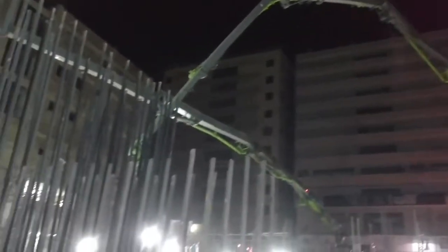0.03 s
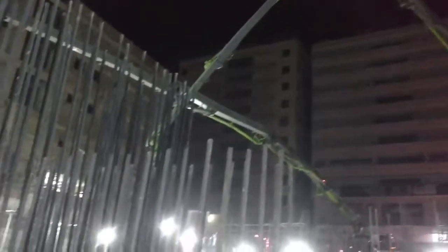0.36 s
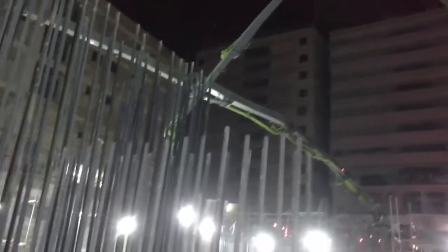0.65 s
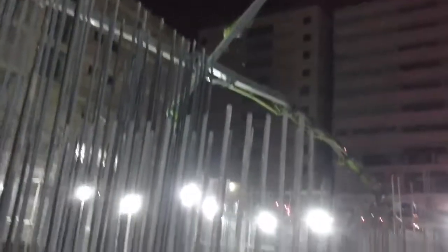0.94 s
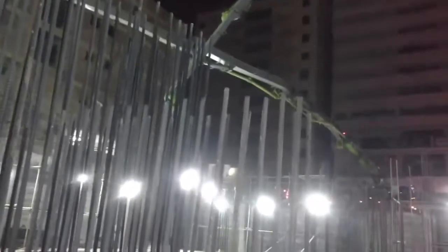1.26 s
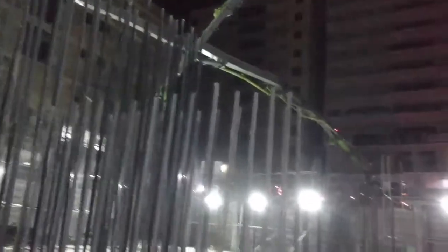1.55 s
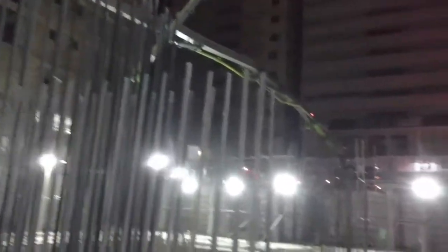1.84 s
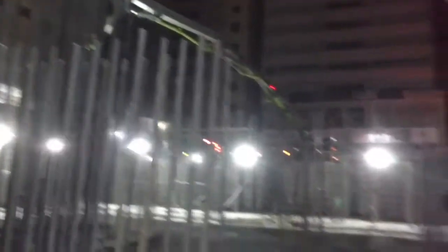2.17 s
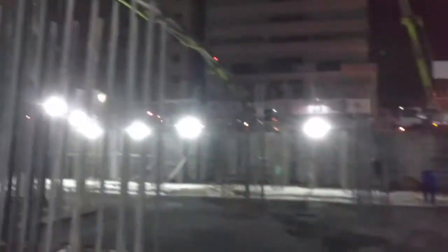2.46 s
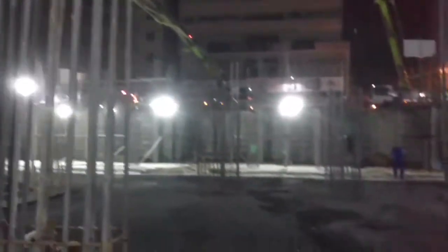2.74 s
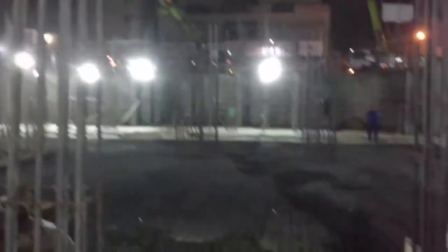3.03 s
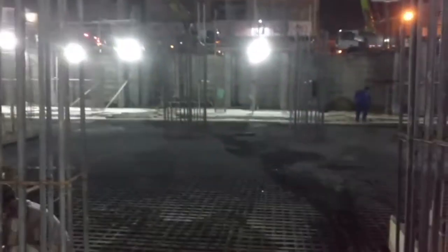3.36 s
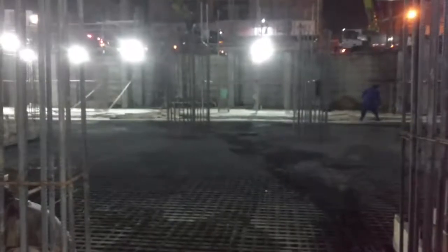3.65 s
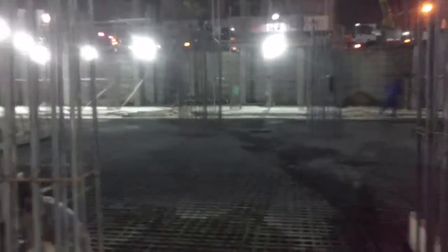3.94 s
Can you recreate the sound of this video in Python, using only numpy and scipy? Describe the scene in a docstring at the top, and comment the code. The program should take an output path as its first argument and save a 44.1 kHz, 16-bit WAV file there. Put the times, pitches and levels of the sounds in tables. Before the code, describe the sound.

Concrete pump running with a diesel roar and wavering whine, faint clanks and one close thump.

```python
"""A diesel drone, a wavering hydraulic whine and a broad roar and hiss carry across a building site
at night: a truck-mounted concrete pump is running, its sound scattered by the buildings.
Steel clanks twice in the distance; something thumps nearby and later scrapes.
Stereo widening combs the sound, and an automatic gain control ducks at the thump."""
import sys
import numpy as np
from scipy import signal
from scipy.fft import rfft, irfft, next_fast_len
from scipy.io import wavfile
from scipy.ndimage import uniform_filter1d, map_coordinates

SR = 44100
rng = np.random.default_rng(int(sys.argv[2]) if len(sys.argv) > 2 else 0)


def output_pcm(signal):
    """Save a mono or channel-first signal as 16-bit PCM at the path in sys.argv[1].

    Samples are clipped to [-1, 1] before scaling.
    """
    pcm = np.clip(np.atleast_2d(signal).T, -1, 1) * 32767
    wavfile.write(sys.argv[1], SR, np.round(pcm).astype(np.int16))


N = 176400

# Knocks on steel. Each row: start in seconds, pitch in Hz, level in dB.
CLANK_HITS = [(.313, 617, -21), (.731, 758, -18)]
# The steel's ring. Each row: multiple of the pitch, relative level in dB, 60 dB decay in seconds.
STEEL_MODES = [(1, -0.5, 0.077), (.86, -5.5, 0.088), (1.3, -9, 0.088)]
# Scrape strokes. Each row: start in seconds, length in seconds, grind in dB, grit in dB.
SCRAPE_STROKES = [(2.313, 0.038, -20.5, -42), (2.366, 0.0463, -25.5, -32), (2.401, 0.05, -23.5, -24),
                  (2.454, 0.0414, -31, -24)]
# The nearby blow. Each row: start in seconds, ring in dB, rattle in dB.
THUMP_HITS = [(0.6691, -5, -16.5)]
# The struck body. Each row: frequency in Hz, relative level in dB, 60 dB decay in seconds.
BODY_MODES = [(236, -10.5, 0.059), (330.2, -3, 0.031), (445, -6, 0.041), (710, -13, 0.031),
              (1090, -7.5, 0.023)]
# Colours of the noise layers. Each row: frequency in Hz, relative spectral density in dB.
GRIND_EQ = [(150, -24), (300, -0.5), (700, -1.5), (1150, 2), (1700, -5.5), (3000, -8), (8000, -47)]
GRIT_EQ = [(800, -31), (2000, -3), (3500, 0.5), (6400, -4), (9000, -7), (12000, -16), (15000, -28)]
RATTLE_EQ = [(200, -10), (450, 2), (800, -4), (1200, -11), (2500, -25), (8000, -40)]
RUMBLE_EQ = [(20, -30), (32, -17), (46, -27), (66, -9.5), (92, -6.5), (135, -4), (200, -1), (260, -0.5),
             (400, -16.5), (900, -68)]
ROAR_EQ = [(120, -43), (220, -20.5), (310, -2.5), (430, -5), (540, -3), (640, -0.5), (720, -3), (830, -4),
           (1060, -4.5), (1500, -7.5), (1850, -12.5), (3500, -51)]
HISS_EQ = [(700, -38), (1300, -5.5), (1600, -4.5), (2150, 3), (2450, -12), (2800, 1), (3250, -1.5),
           (4200, -6), (6200, -7.5), (8200, -12.5), (11000, -17.5), (13200, -25.5), (14500, -27.5),
           (15200, -60)]
# Fader rides on the machinery, before the trims. Each row: time in seconds, roar in dB, hiss in dB.
NOISE_RIDES = [(0, -25, -26), (0.2, -25.5, -26.5), (0.4, -25, -23.5), (0.6, -24.2, -23),
               (0.85, -24.5, -24.5), (1.05, -24.5, -22.5), (1.3, -24.5, -22.5), (1.6, -25.5, -20),
               (1.85, -23.5, -21), (2.05, -24.5, -23.5), (2.25, -24, -22), (2.55, -25.5, -24),
               (2.75, -27.0, -27.5), (3.05, -23.5, -23.5), (3.3, -24.5, -23.5), (3.5, -24.5, -24.5),
               (3.75, -22.5, -23), (4, -21, -22)]
# Fan and gear tones, and a ring of the pump's housing at 634 Hz. Each row: frequency in Hz, level in dB.
HUM_TONES = [(414, -51), (483, -47), (538, -45), (577, -58.5), (634, -46), (757, -45), (1087, -44)]
# The diesel drone. Each row: multiple of the working cycle, level in dB.
ENGINE_ORDERS = [(6, -60.5), (8, -53), (9, -53.5), (12, -46.5), (14, -54.5)]
# The hydraulic pump's speed, heard as its whine. Each row: time in seconds, pitch in Hz.
WHINE_PITCH = [(0, 334), (.32, 314.7), (.45, 334), (.8, 336.6), (1.5, 338.4), (1.85, 332.4), (2.2, 340),
               (2.32, 348.5), (2.44, 332.2), (2.95, 325.5), (3.2, 338.6), (3.45, 337.6), (3.62, 342),
               (3.8, 343), (4, 348.4)]
# Fader rides on the whine. Each row: time in seconds, then harmonics one, two and three in dB.
WHINE_RIDES = [(0, -41, -54, -51), (.25, -48, -40, -61), (.4, -55, -31.5, -39), (.6, -38, -35, -39),
               (.95, -55, -38, -39), (1.35, -46, -40, -47), (1.55, -65, -33.5, -38), (1.7, -36, -38, -40),
               (1.78, -27, -30, -36), (1.84, -32, -25.5, -38), (2.0, -36.5, -38, -48), (2.2, -49, -42, -62),
               (2.32, -54, -30.5, -39), (2.42, -52, -34, -47), (2.53, -44, -33, -43), (2.9, -42, -41, -44),
               (3.06, -42, -25.5, -37), (3.14, -36, -31.5, -34), (3.35, -46, -32, -34.5),
               (3.55, -55, -29, -36.5), (3.83, -44, -36, -41), (4, -53, -26, -45)]
# Stereo image of the low end. Each row: frequency in Hz, left-right likeness (1 is mono).
BASS_LIKENESS = [(30, 0.16), (130, 0.56), (400, 0.37), (650, 0.68), (850, 0.56), (1050, 1), (1260, 0.66)]

CLANK_ATTACK_S = 0.005  # softened by distance
SCRAPE_ATTACK_S, SCRAPE_RELEASE_S = 0.017, 0.005
THUMP_ATTACK_S, RATTLE_T60_S = 0.00037, 0.17
THUMP_LOW_CUT_HZ = 110  # trims the deep bass from the thump
CYCLE_HZ = 12.34  # the diesel's working cycle
RUMBLE_DB, ROAR_TRIM_DB, HISS_TRIM_DB = -34.5, -1.7, -1.01
WHINE_WANDER_HZ, WHINE_FLUTTER_DB = 2.757, 3
TONE_WIDTH = 0.6  # side level relative to the direct tone
COMB_SPACING_HZ, COMB_DEPTH, COMB_BIAS = 2535, 1.08, 0.023
THRESHOLD_DB, RECOVER_DB_PER_S = -13.5, 7.5
TOP_HZ = 14900


def amp(db):
    """Decibels to gain."""
    return 10 ** (np.asarray(db) / 20)


def unit(x):
    """Scale to rms 1."""
    return x / np.sqrt(np.mean(x ** 2) + 1e-20)


def along(points, hz):
    """Read (Hz, value) points along a log frequency axis."""
    freqs, values = np.transpose(points)
    return np.interp(np.log(hz + 1), np.log(freqs + 1), values)


def curves(rows):
    """One automation curve for each column after the time."""
    times, *columns = np.transpose(rows)
    return [np.interp(np.arange(N) / SR, times, column) for column in columns]


def wobble(rate):
    """A smooth random curve, rate knots a second."""
    return map_coordinates(rng.standard_normal(1024), [np.arange(N) * rate / SR], mode="wrap")


def filtered(x, response):
    """Equalise x with a gain given as a function of Hz."""
    size = next_fast_len(N + SR // 2)
    return irfft(rfft(x, size) * response(np.fft.rfftfreq(size, 1 / SR)), size)[..., :N]


def rush(eq, patchy_db=1.0):
    """Diffuse stereo noise of rms 1, mottled with patches of random gain."""
    bins = signal.stft(rng.standard_normal((2, N)), nperseg=512)[2]
    patches = uniform_filter1d(rng.standard_normal(bins.shape[1:]), size=5, axis=0)
    patches = uniform_filter1d(patches, size=14, axis=1)
    noise = signal.istft(bins * amp(patchy_db * unit(patches)), nperseg=512)[1][:, :N]
    return unit(filtered(noise, lambda hz: amp(along(eq, hz))))


def phase_of(hz):
    """Running phase of a frequency curve."""
    return 2 * np.pi * np.cumsum(hz) / SR + rng.uniform(0, 2 * np.pi)


def tone(phase, flutter_db, rate):
    """A stereo partial of rms 1 that flutters as its reflections shift."""
    direct = unit(amp(flutter_db * wobble(rate)) * np.sin(phase))
    side = TONE_WIDTH * unit(wobble(rate) * np.sin(phase) + wobble(rate) * np.cos(phase))
    return unit(np.array([direct + side, direct - side]))


def clanks():
    """Distant knocks on steel: a few short modes that reach both sides by many paths."""
    out = np.zeros((2, N))
    for start, pitch_hz, level_db in CLANK_HITS:
        t = np.maximum(np.arange(N) / SR - start, 0)
        phase = 2 * np.pi * pitch_hz * t
        ring = sum(amp(db - 60 * t / t60) * tone(ratio * phase, flutter_db=1, rate=40)
                   for ratio, db, t60 in STEEL_MODES)
        out += amp(level_db) * (1 - np.exp(-t / CLANK_ATTACK_S)) * ring
    return out


def scrapes():
    """Each stroke swells and stops short: a low grind with bright, uneven grit."""
    t, out = np.arange(N) / SR, np.zeros((2, N))
    for start, length, grind_db, grit_db in SCRAPE_STROKES:
        attack = np.clip((t - start) / SCRAPE_ATTACK_S, 0, 1)
        release = np.clip(1 - (t - start - length) / SCRAPE_RELEASE_S, 0, 1)
        grind = amp(grind_db + 1.9 * wobble(83)) * rush(GRIND_EQ)
        grit = amp(grit_db + 2.0 * wobble(220)) * rush(GRIT_EQ)
        out += attack * release * (grind + grit)
    return out


def thump():
    """A dull nearby blow sets off a few damped modes and a short rattle."""
    out = np.zeros((2, N))
    for start, ring_db, rattle_db in THUMP_HITS:
        t = np.maximum(np.arange(N) / SR - start, 0)
        ring = sum(amp(ring_db + db - 60 * t / t60) * np.cos(2 * np.pi * hz * t)
                   for hz, db, t60 in BODY_MODES)
        rattle = amp(rattle_db - 60 * t / RATTLE_T60_S) * rush(RATTLE_EQ)
        out += (1 - np.exp(-t / THUMP_ATTACK_S)) * (rattle - ring)
    low_cut = signal.butter(2, THUMP_LOW_CUT_HZ, "highpass", fs=SR, output="sos")
    return signal.sosfilt(low_cut, out)


def machine_hums():
    """Spinning parts and the ringing housing hum, each drifting slightly around its own pitch."""
    return sum(amp(db) * tone(phase_of(hz * (1 + 0.00491 * wobble(12))), flutter_db=3, rate=4.86)
               for hz, db in HUM_TONES)


def diesel():
    """Harmonics of the engine's cycle drone over a wavering bed of rumble, roar and hiss."""
    cycle = phase_of(CYCLE_HZ * (1 + 0.0035 * wobble(3.08)))
    drone = sum(amp(db) * tone(order * cycle, flutter_db=0, rate=4.46) for order, db in ENGINE_ORDERS)
    roar_db, hiss_db = curves(NOISE_RIDES)
    rumble = amp(RUMBLE_DB + 0.8 * wobble(16)) * rush(RUMBLE_EQ)
    roar = amp(roar_db + ROAR_TRIM_DB + 0.29 * wobble(25.18)) * rush(ROAR_EQ)
    hiss = amp(hiss_db + HISS_TRIM_DB + 0.61 * wobble(30.52)) * rush(HISS_EQ)
    return drone + rumble + roar + hiss


def hydraulic_whine():
    """The pump sings in three harmonics whose pitch sags and rises with its load."""
    phase = phase_of(curves(WHINE_PITCH)[0] + WHINE_WANDER_HZ * wobble(30.03))
    return sum(amp(db) * tone(harmonic * phase, WHINE_FLUTTER_DB, rate=18)
               for harmonic, db in enumerate(curves(WHINE_RIDES), start=1))


def scene():
    """Far clanks and small close noises, mixed with the running concrete pump."""
    return clanks() + scrapes() + thump() + machine_hums() + diesel() + hydraulic_whine()


def widen(x):
    """Above the low end the channels swing between in phase and out of phase along a comb."""
    def mid_side_gains(hz):
        comb = COMB_BIAS - COMB_DEPTH * np.cos(2 * np.pi * hz / COMB_SPACING_HZ)
        likeness = np.where(hz < COMB_SPACING_HZ / 2, along(BASS_LIKENESS, hz), comb)
        likeness = np.clip(likeness, -0.9996, 0.9996)
        return np.sqrt([1 + likeness, 1 - likeness])
    mid, side = filtered(np.array([x[0] + x[1], x[0] - x[1]]) / 2, mid_side_gains)
    return np.array([mid + side, mid - side])


def gain_control(x):
    """The gain ducks at once on a loud peak and creeps back."""
    power = uniform_filter1d(np.mean(x ** 2, axis=0), size=150)
    over_db = np.maximum(10 * np.log10(np.abs(power) + 1e-12) - THRESHOLD_DB, 0)
    creep_db = RECOVER_DB_PER_S * np.arange(N) / SR
    duck_db = np.maximum.accumulate(over_db + creep_db) - creep_db
    return x * amp(-uniform_filter1d(duck_db, size=90))


def record(dry):
    """The master chain: stereo widening, gain control and a brick-wall high cut."""
    return filtered(gain_control(widen(dry)), lambda hz: hz < TOP_HZ)


dry = scene()
out = record(dry)
output_pcm(out)
```